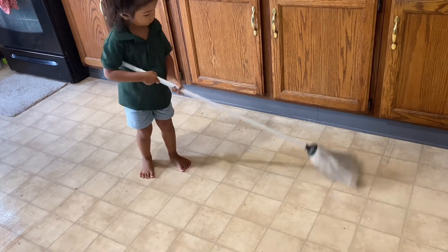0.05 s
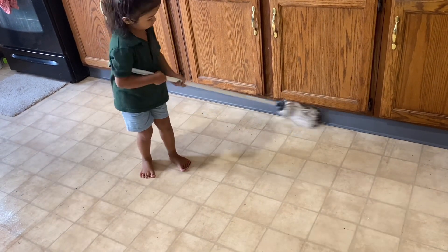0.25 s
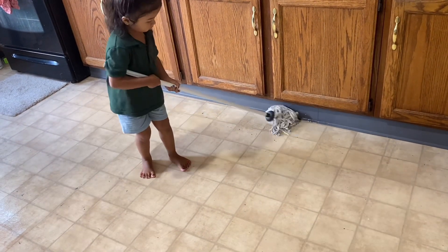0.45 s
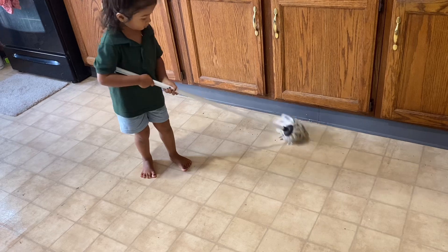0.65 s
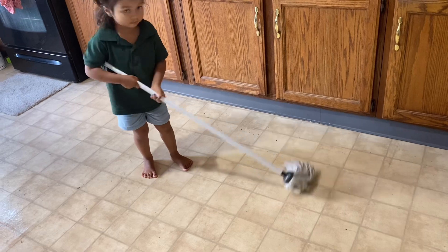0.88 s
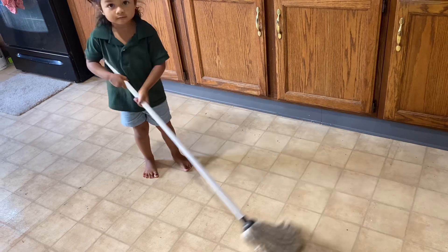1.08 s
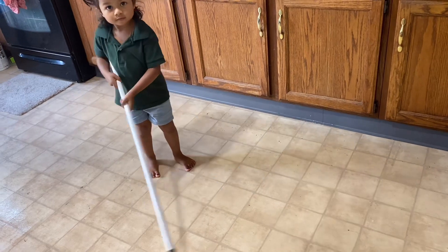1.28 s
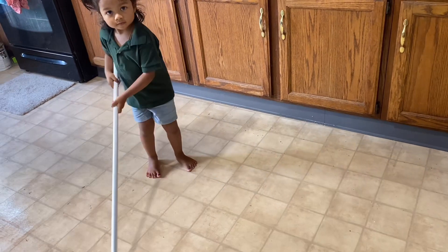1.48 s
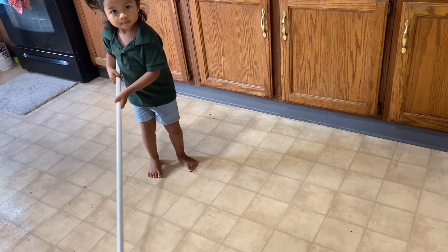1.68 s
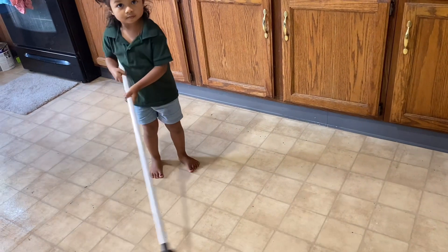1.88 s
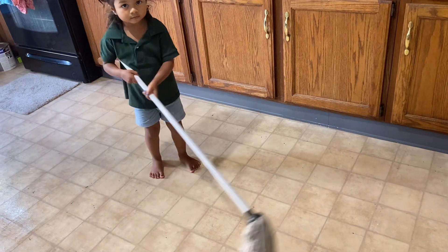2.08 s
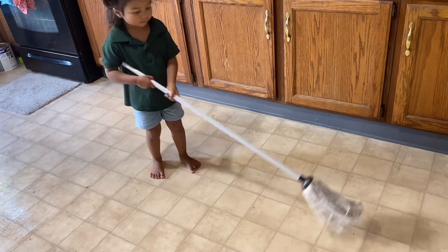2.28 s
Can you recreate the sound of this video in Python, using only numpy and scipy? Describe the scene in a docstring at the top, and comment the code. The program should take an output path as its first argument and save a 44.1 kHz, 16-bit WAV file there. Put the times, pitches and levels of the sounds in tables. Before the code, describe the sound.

A mop bumps a wooden cabinet with a dull thump, then swishes faintly over the floor.

```python
"""An appliance fan drones in a small, hard kitchen as a string mop swishes over the vinyl floor.
Its strands slap the cabinet base, the plastic head clacks against it, and the impact excites the
resonant modes of the hollow cabinet, which booms. The head drops back to the floor and the strands
swish on to and fro, making friction noise. A thin, high sizzle comes and goes."""
import sys
import numpy as np
from scipy import signal
from scipy.fft import rfft, irfft
from scipy.io import wavfile

SR = 44100
rng = np.random.default_rng(int(sys.argv[2]) if len(sys.argv) > 2 else 0)


def int16_out(signal):
    """Quantize to a 16-bit WAV file."""
    q = np.round(np.clip(np.atleast_2d(signal).T, -1, 1) * 32767)
    wavfile.write(sys.argv[1], SR, q.astype(np.int16))


N = 108045
T = np.arange(N) / SR


def from_db(db):
    """Amplitude ratio: tenfold for every 20 dB."""
    return 10 ** (np.asarray(db) / 20)


def rms_one(x):
    """Normalisation to unit mean power."""
    return x / np.sqrt(np.mean(x ** 2) + 1e-20)


def at_hz(points, hz):
    """Interpolation on a logarithmic frequency axis."""
    frequencies, values = np.transpose(points)
    return np.interp(np.log(hz + 1e-9), np.log(frequencies), values)


def envelope(curve):
    """Amplitude envelope, linear in decibels between points."""
    return from_db(np.interp(T, *np.transpose(curve)))


# Likeness of the room's sound at the two ears: frequency_hz, correlation
EAR_CORRELATION = [(60, 0.81), (200, 0.83), (400, 0.76), (700, -0.048), (1300, 0.033), (2400, 0.21),
                   (4400, 0.33), (8000, 0.053), (16000, -0.089)]

def noise(spectrum=((20, 0), (20000, 0))):
    """Partial coherence: mid and side noise mix to the room's correlation; rms 1, white by default."""
    hz = np.fft.rfftfreq(N, 1 / SR)
    mid, side = rfft(rng.standard_normal((2, N)))
    correlation = np.clip(at_hz(EAR_CORRELATION, hz), -1, 1)
    ears = np.sqrt(1 + correlation) * mid + np.sqrt(1 - correlation) * side * [[1], [-1]]
    return rms_one(irfft(ears * from_db(at_hz(spectrum, hz)), N))


def narrow_noise(hz, width_hz):
    """Band-pass filtering gives noise a pitch and a wavering amplitude; rms 1."""
    band = signal.butter(2, [hz - width_hz / 2, hz + width_hz / 2], "band", fs=SR, output="sos")
    return rms_one(signal.sosfilt(band, np.tile(noise(), 2))[:, N:])  # the first pass settles the filter


def ring(force, modes):
    """Modal superposition: each mode's impulse response is a damped cosine; neighbours alternate in sign."""
    out = 0
    for k, (hz, db, t60) in enumerate(modes):
        decay, step = from_db(-60 / (t60 * SR)), 2 * np.pi * hz / SR
        feedback = decay * np.cos(step)
        mode = signal.lfilter([1, -feedback], [1, -2 * feedback, decay ** 2], force + 1e-18)
        out = out + (-1) ** k * from_db(db) * mode
    return out


def bursts(events, t60_s):
    """Incoherent addition: sudden, exponentially decaying envelopes sum in power."""
    power = sum((T >= s) * from_db(db - 60 * np.maximum(T - s, 0) / t60_s) ** 2 for s, db in events)
    return np.sqrt(power)


# Reverberation time of the kitchen: frequency_hz, t60_s
KITCHEN_DECAY = [(100, 0.26), (500, 0.33), (2000, 0.27), (6000, .3), (16000, 0.097)]
TAIL_LOW_HZ, CUTOFF_HZ, ROOM_GAP_S = 240, 15900, 0.0035

def kitchen(dry, wet_db):
    """Reverberation adds a diffuse tail that dies soonest in the high treble."""
    t, edges, tail = T[:SR // 2], np.geomspace(TAIL_LOW_HZ, CUTOFF_HZ, 8), 0
    white = noise()[:, :len(t)]
    for low, high in zip(edges, edges[1:]):
        band = signal.sosfilt(signal.butter(2, [low, high], "band", fs=SR, output="sos"), white)
        tail = tail + band * from_db(-60 * t / at_hz(KITCHEN_DECAY, np.sqrt(low * high)))
    tail = rms_one(tail * (t > ROOM_GAP_S)) / np.sqrt(len(t))
    return dry + from_db(wet_db) * signal.fftconvolve(np.atleast_2d(dry), tail, axes=1)[:, :N]


# Rush of the fan's air: frequency_hz, density_db
RUSH_SPECTRUM = [(15, -49), (28, -12), (55, -7.5), (78, -4), (97, -5.5), (112, -10), (135, 0), (160, -4),
                 (185, -4), (250, -10), (305, -10), (348, -2.5), (375, -5), (408, -9), (450, -11.5),
                 (492, -7.5), (550, -13.5), (750, -20), (1100, -26), (2000, -35), (3500, -38.5),
                 (5700, -44.5), (6800, -37), (7700, -37.5), (11000, -99), (16000, -44.5)]
# Tones of the hum: pitch_hz, level_db
HUM_PARTIALS = [(395, -3), (418, -1), (497, -13.5)]
# Swelling and fading of the hum: time_s, level_db
HUM_ENVELOPE = [(0, -53), (.08, -49), (.2, -58.5), (.45, -52.5), (.62, -63), (.8, -57.5), (.92, -56.5),
                (1.02, -48), (1.18, -48.5), (1.45, -60.5), (1.6, -53), (1.8, -57), (1.95, -56.5),
                (2.1, -53.5), (2.24, -55), (2.45, -64)]
RUSH_DB, HUM_WIDTH_HZ = -46.5, 9

def fan():
    """Beating: three wavering tones interfere over a dull, broadband rush of air."""
    hum = 0
    for hz, db in HUM_PARTIALS:
        tone = signal.hilbert(narrow_noise(hz, HUM_WIDTH_HZ))
        power = np.mean(np.abs(tone) ** 2, axis=0)
        hum = hum + from_db(db) * rms_one(tone.real / np.sqrt(power + .1))  # evens out the random swells
    return from_db(RUSH_DB) * noise(RUSH_SPECTRUM) + envelope(HUM_ENVELOPE) * hum


# Swells of a thin, high sizzle: centre_s, length_s, pitch_hz, level_db
SIZZLE_SWELLS = [(0.399, 0.13, 4390, -70.5), (0.575, .15, 4500, -73), (.78, 0.12, 4900, -77),
                 (0.977, 0.18, 4450, -70), (1.335, 0.19, 4560, -72.5), (1.65, 0.15, 4940, -75),
                 (1.686, 0.22, 4510, -70.5), (2.063, 0.086, 4920, -77), (2.137, .14, 4560, -75.5)]
SIZZLE_WIDTH_HZ, SIZZLE_RISE_HZ_PER_S = 205, 480

def sizzle():
    """Frequency shifting: each faint, briefly held band of noise glides a little upward."""
    out = 0
    for s, length, hz, db in SIZZLE_SWELLS:
        rise = np.exp(1j * np.pi * SIZZLE_RISE_HZ_PER_S * (T - s) ** 2)
        held = np.exp(-(2 * (T - s) / length) ** 6 / 2)
        band = signal.hilbert(narrow_noise(hz, SIZZLE_WIDTH_HZ))
        out = out + from_db(db) * held * (band * rise).real
    return out


# Low-mid rub of strands on the floor: time_s, level_db
RUB_ENVELOPE = [(0, -66.5), (.16, -67), (.185, -55), (.225, -56.5), (.34, -62), (.5, -68.5), (.74, -66.5),
                (.88, -59), (.95, -62), (1.13, -62), (1.25, -63.5), (1.37, -63.5), (1.6, -72), (1.8, -69),
                (2.0, -65.5), (2.32, -68.5), (2.38, -58), (2.45, -60)]
# Colour of the rub: frequency_hz, density_db
RUB_SPECTRUM = [(300, -7), (800, 7.5), (1400, 0.5), (2400, -1.5), (3500, -10.5), (6000, -12), (16000, -75)]
# Fine hiss of the strands: time_s, level_db
HISS_ENVELOPE = [(0, -72), (.09, -77.5), (.165, -66.5), (.19, -61.5), (.23, -60.5), (.3, -65), (.38, -73),
                 (.44, -70.5), (.51, -74.5), (.66, -69.5), (.8, -70.5), (.95, -70), (1.18, -70),
                 (1.52, -72), (1.63, -81), (1.8, -73.5), (1.97, -80), (2.31, -80), (2.37, -66.5),
                 (2.45, -66.5)]
# Colour of the hiss: frequency_hz, density_db
HISS_SPECTRUM = [(1000, -45), (3000, 7), (5000, 20), (7500, -6), (11000, 19), (16000, 7.5)]
# Quick skids of the head across the floor: centre_s, half_width_s, peak_hz, level_db
HEAD_SKIDS = [(.86, .03, 1680, -63.5), (1.02, 0.018, 1900, -66), (1.1, 0.049, 2920, -62.5),
              (1.185, 0.029, 3220, -60), (1.365, 0.017, 2200, -67), (1.81, 0.035, 2430, -69)]
# Colour of a skid: multiple_of_peak, density_db
SKID_SPECTRUM = [(.3, -24), (.72, -7), (1, 0), (1.25, -8), (1.9, -14), (5, -43)]
GRAIN_DB, GRAIN_PER_S = 1.5, 120

def floor_sweep():
    """Sliding friction: the mop rubs, hisses and skids, its level fluttering as single strands catch."""
    skids = 0
    for s, width, hz, db in HEAD_SKIDS:
        swell = from_db(db) * np.exp(-((T - s) / width) ** 2 / 2)
        skids = skids + swell * noise([(ratio * hz, density) for ratio, density in SKID_SPECTRUM])
    rub = envelope(RUB_ENVELOPE) * noise(RUB_SPECTRUM)
    hiss = envelope(HISS_ENVELOPE) * noise(HISS_SPECTRUM)
    flutter = np.interp(T * GRAIN_PER_S, np.arange(N), rng.standard_normal(N))
    return from_db(GRAIN_DB * flutter) * (rub + hiss + skids)


# Strands striking the cabinet base: start_s, level_db
STRAND_SLAPS = [(.1725, -3), (.1772, 2), (.182, 0), (.2326, 5), (.2384, 4)]
# Colour of a slap: frequency_hz, density_db
SLAP_SPECTRUM = [(500, -12), (2000, -3), (5000, 4), (8000, 1), (11000, 10), (16000, 1)]
SLAP_GAIN_DB = -47

def strand_slaps():
    """Impact noise: cotton strands hit the base in bright, heavily damped bursts."""
    slaps = from_db(SLAP_GAIN_DB) * bursts(STRAND_SLAPS, t60_s=.008) * noise(SLAP_SPECTRUM)
    return kitchen(slaps, wet_db=-8)


# Soft, heavy blows of the head on cabinet and floor: centre_s, impulse_db, contact_ms
SOFT_BLOWS = [(0.24, -28.5, 3.17), (0.2554, -35.5, 1.35), (0.2791, -14.5, 10.15), (0.4143, -28, 8.1),
              (0.4794, -34.5, 7.5), (.646, -26.5, 12.6), (0.713, -37, 8.8)]
# Resonances of cabinet and floor: pitch_hz, level_db, t60_s
CABINET_MODES = [(58.3, -6, 0.42), (77, -9.5, 0.34), (137, -1, 0.076), (158.9, 6, 0.5), (207, 2, 0.14),
                 (251.5, 5.5, 0.073), (346.7, 0.5, 0.23), (392, 0, 0.12), (424, 11, 0.078), (540, 1, 0.053),
                 (618, 1.5, 0.077), (680, -8, .14)]
RADIATION_LOW_HZ = 44.6

def cabinet_boom():
    """Impulse excitation of modes: a longer contact is duller, and the deepest bass is not radiated."""
    force = 0
    for s, db, contact_ms in SOFT_BLOWS:
        push = np.exp(-(4000 * (T - s) / contact_ms) ** 2 / 2)  # contact spans four standard deviations
        force = force + from_db(db) * push / push.sum()
    radiation = signal.butter(3, RADIATION_LOW_HZ, "high", fs=SR, output="sos")
    return kitchen(signal.sosfilt(radiation, ring(force, CABINET_MODES)), wet_db=-7)


# Hard contacts of the plastic head: start_s, level_db, tilt_db_per_octave
HEAD_CLACKS = [(0.2332, -3.5, -3), (0.2364, 1.5, -1.5), (.239, -3, 2), (0.244, -1, -0.5), (0.249, -4.5, 1),
               (0.257, -9, 2.5), (0.2647, -9.5, -0.5)]
# Colour of a clack before its tilt: frequency_hz, density_db
CLACK_SPECTRUM = [(200, 2.5), (600, 8), (900, -1.5), (1400, 4.5), (2300, 4.5), (3500, -4), (5000, -5.5),
                  (6800, -12), (8500, -29), (11000, -16.5), (16000, -44)]
# Faint, brief ringing tones that colour the hardest clack: pitch_hz, level_db
CLACK_RING_TONES = [(1162, 6), (1402, 11), (1753, 10), (2138, 7), (2230, 2.5), (2358, 2.5), (2719, 8),
                    (2813, 0), (3006, 0), (3495, -7), (3818, -4), (6509, -1)]
CLACK_GAIN_DB, CLACK_PAN_DB = -33, 0.5
RING_GAIN_DB, RING_T60_S = -60, .18

def mop_head():
    """Hard impacts are broadband: plastic clacks on wood; faint, brief tones colour the hardest clack."""
    hardest_s, hardest_db, _ = max(HEAD_CLACKS, key=lambda clack: clack[1])
    blow = np.zeros(N)
    blow[int(hardest_s * SR)] = from_db(hardest_db + RING_GAIN_DB)
    ringing = ring(blow, [(hz, db, RING_T60_S) for hz, db in CLACK_RING_TONES])
    clacks = 0
    for s, db, tilt in HEAD_CLACKS:
        spectrum = [(hz, density + tilt * np.log2(hz)) for hz, density in CLACK_SPECTRUM]
        clacks = clacks + bursts([(s, CLACK_GAIN_DB + db)], t60_s=0.012) * noise(spectrum)
    pan = from_db([[CLACK_PAN_DB / 2], [-CLACK_PAN_DB / 2]])
    return kitchen(clacks + ringing, wet_db=0) * pan


def scene():
    """Superposition: the sounds of mop and cabinet add to the fan and the sizzle."""
    return fan() + sizzle() + floor_sweep() + strand_slaps() + cabinet_boom() + mop_head()


def record(dry):
    """Band limiting: a steep low-pass filter removes the highest treble."""
    return signal.sosfilt(signal.ellip(10, .1, 70, CUTOFF_HZ, fs=SR, output="sos"), dry)


dry = scene()
out = record(dry)
int16_out(out)
```